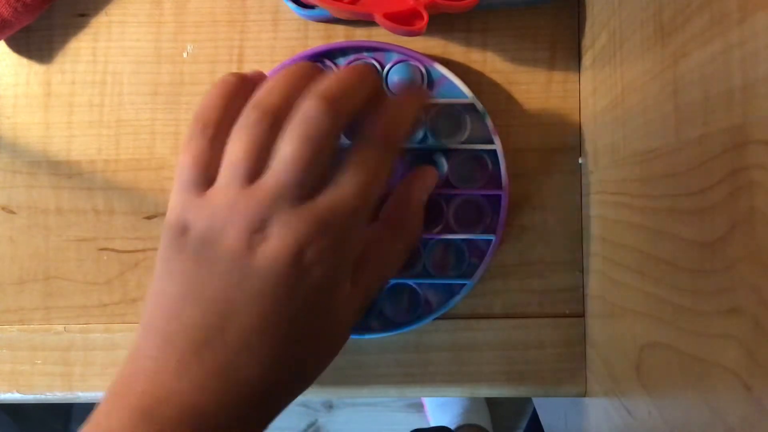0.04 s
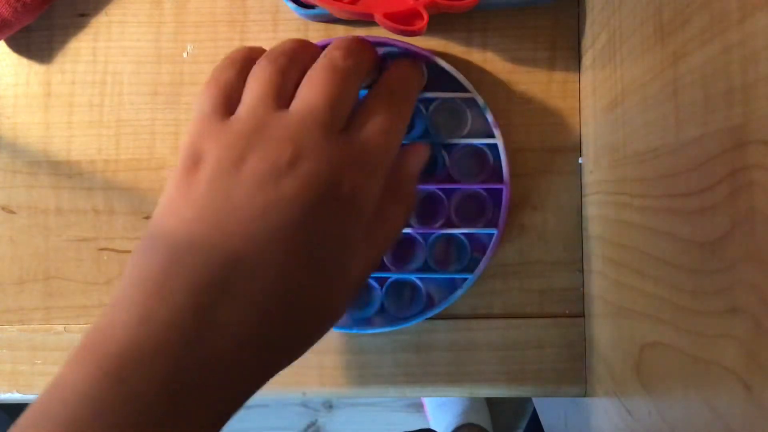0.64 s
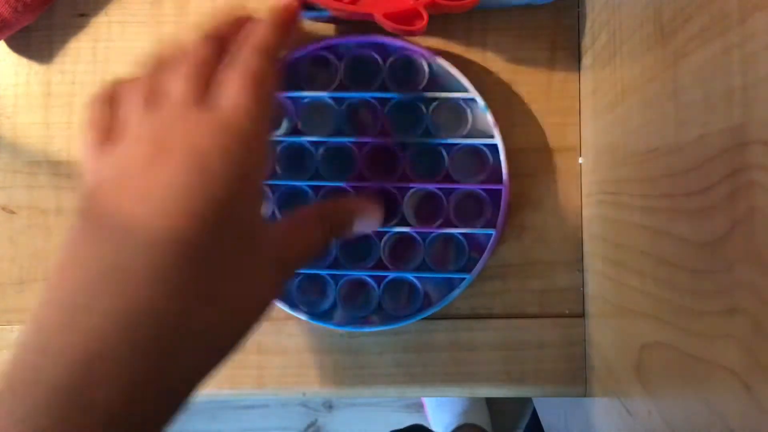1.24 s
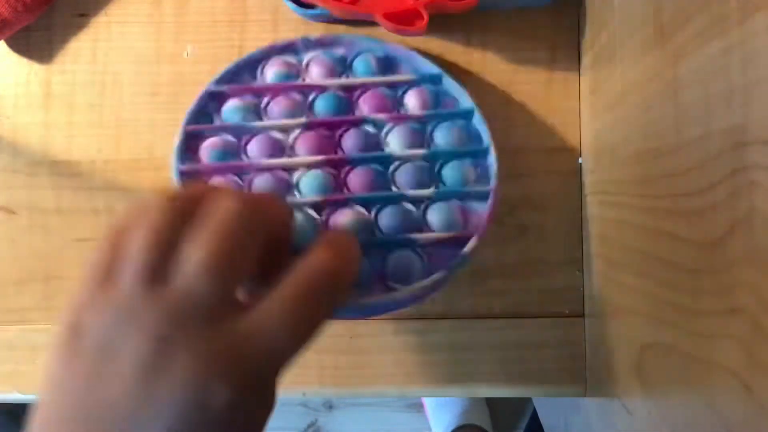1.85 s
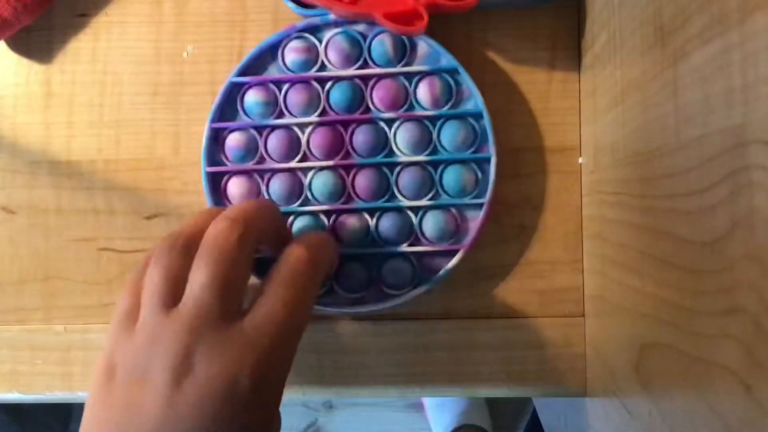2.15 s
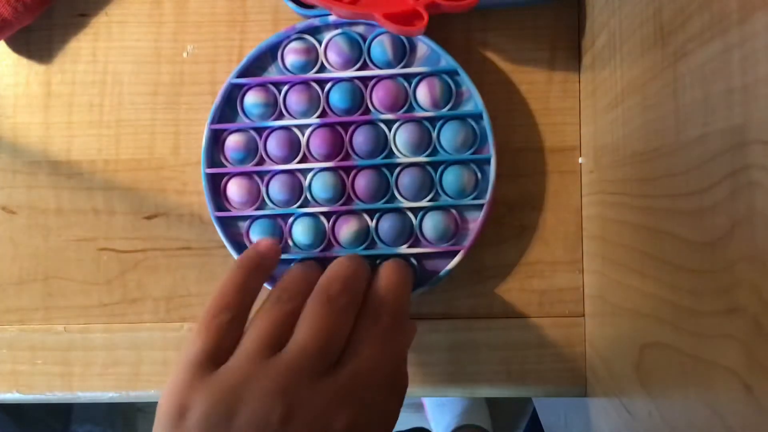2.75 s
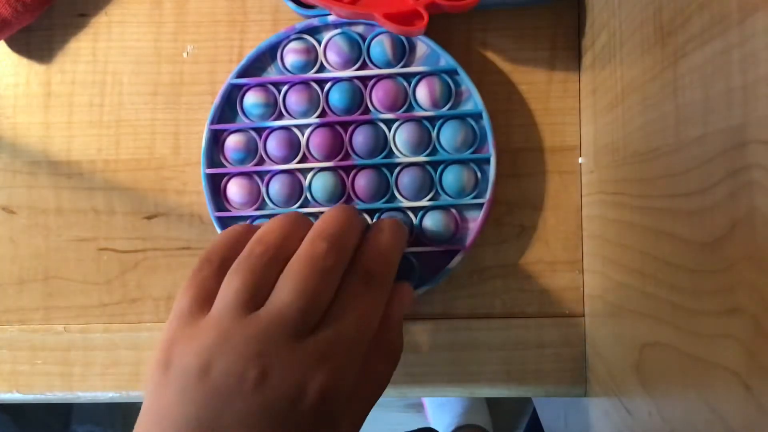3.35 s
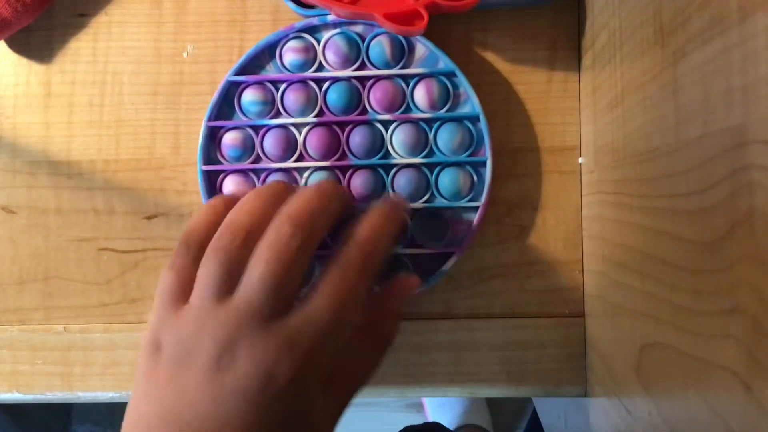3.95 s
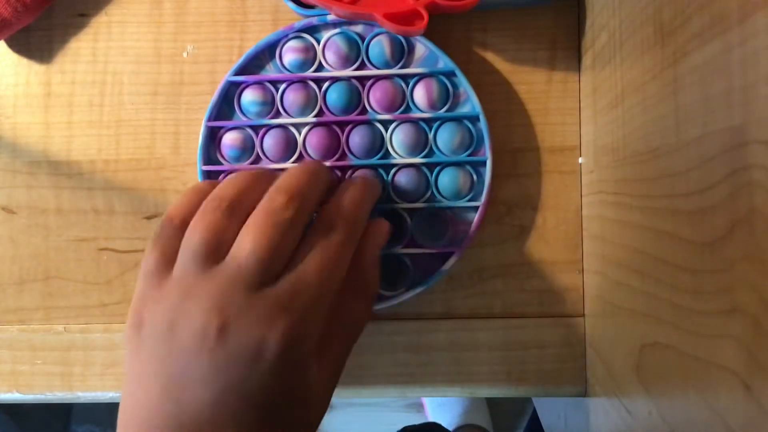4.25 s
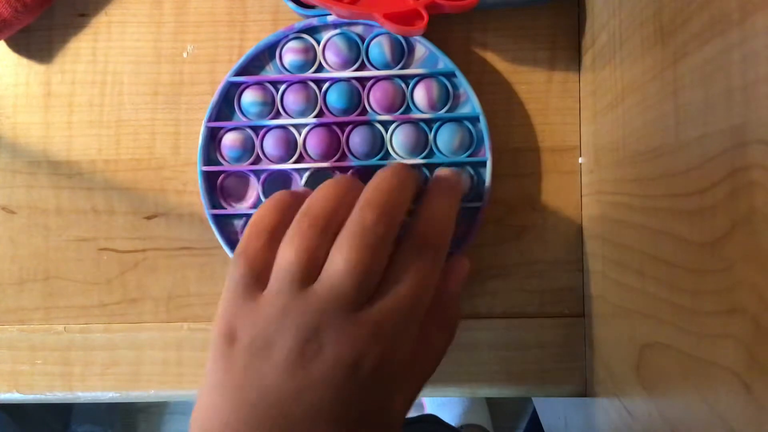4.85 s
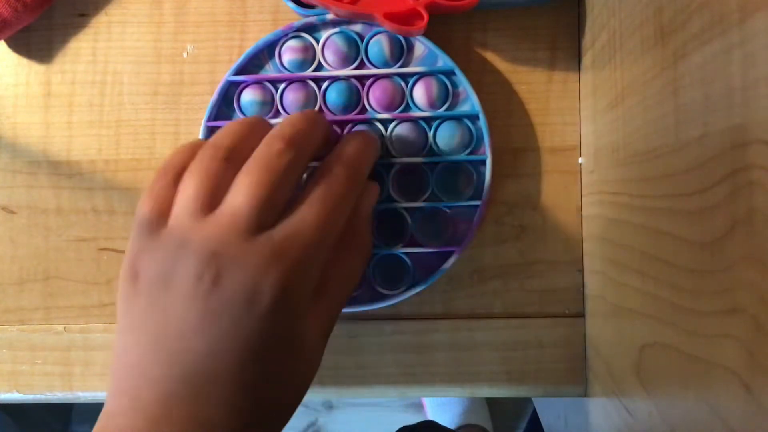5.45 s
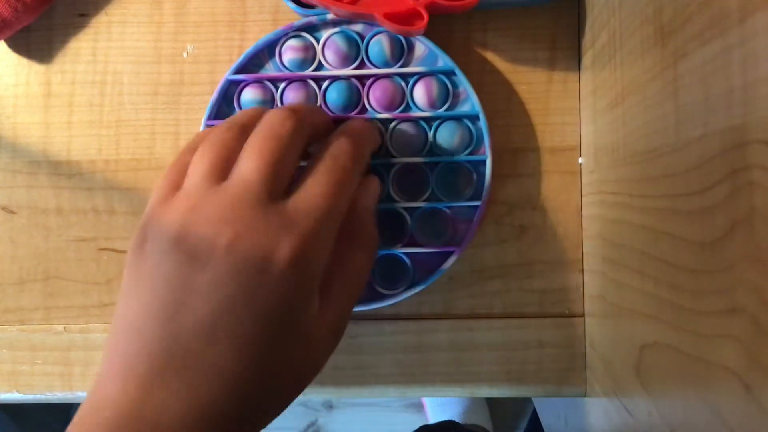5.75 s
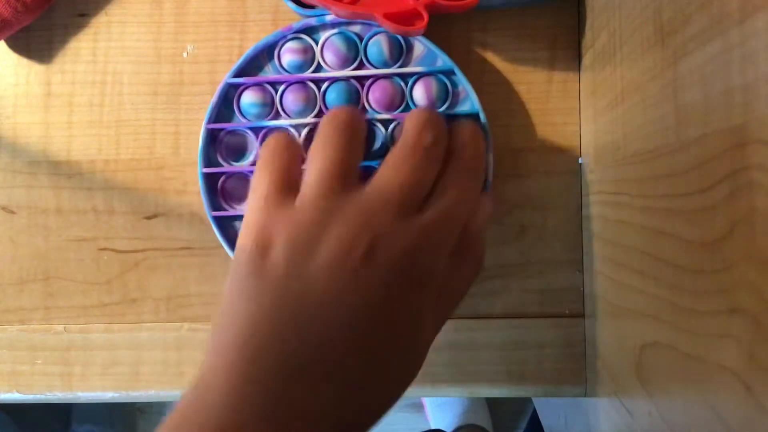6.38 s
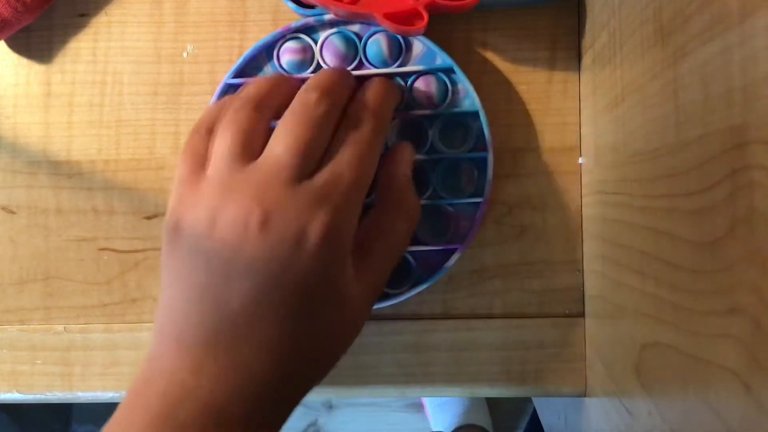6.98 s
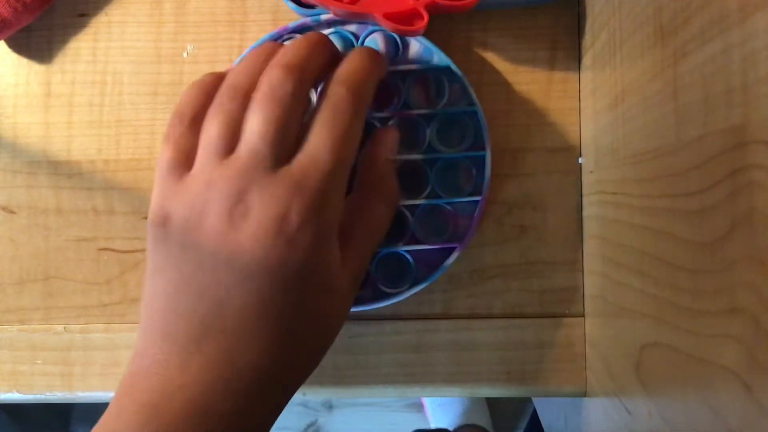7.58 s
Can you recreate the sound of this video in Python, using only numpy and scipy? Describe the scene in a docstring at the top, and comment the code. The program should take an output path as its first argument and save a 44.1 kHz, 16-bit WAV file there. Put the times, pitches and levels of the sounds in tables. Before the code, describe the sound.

Fingers press the bubbles of a silicone pop toy on a wooden table, making clusters of sharp pops with soft taps between.

```python
"""A silicone pop toy on a wooden table in a small quiet room, the microphone close above it.
First come light fingertip taps and one soft pop; then the toy is lifted, turned over and slid back.
From about 2 s several fingers press at once and the pops come in clusters: each dome crackles as it
buckles, snaps through and rings the air pocket under it, and the finger thumps the table.
Between clusters the fingertips tap and rub the rubber; a last tap leaves the low drone of the room."""
import sys
import numpy as np
from scipy import signal
from scipy.fft import rfft, irfft
from scipy.io import wavfile

SR = 44100
rng = np.random.default_rng(int(sys.argv[2]) if len(sys.argv) > 2 else 0)


def generate_wav(sig):
    """Save sig (samples, or channels by samples) to the path in sys.argv[1] as 16-bit PCM at SR."""
    pcm = np.round(np.clip(np.atleast_2d(sig).T, -1, 1) * 32767).astype(np.int16)
    wavfile.write(sys.argv[1], SR, pcm)


N = 340452

# colours of the rubber's slap and of the crackle before it: (frequency [Hz], level [dB])
SLAP_COLOUR = [(100, -42.5), (400, -9), (900, -8), (1350, 5), (1900, -5.5), (2300, -6.5), (2800, -7),
               (3800, -16.5), (6000, -35.5), (10000, -35.5), (16000, -69)]
CRACKLE_COLOUR = [(300, -22), (1500, -8), (2800, 5.5), (3800, -4), (5000, 1.5), (6200, 3.5), (7200, -2),
                  (9500, 0.5), (12000, -9.5), (16000, -21.5)]
# domes snapping through, close under the microphone: (time [s], air pocket [dB], pocket pitch [Hz],
# pocket swell [ms], slap [dB], crackle [dB], air squirt [Hz], thump [dB], thump pitch [Hz])
DOME_SNAPS = [ (0.3025, -27, 710, 0.87, -38, -47, 5830, -34, 222),
              (1.8172, -28, 570, 1.4, -35, -42.5, 3340, -29.5, 234),
              (2.1369, -10, 680, 0.5, -13.5, -32, 3000, -19, 291),
              (2.7035, -13.5, 840, 0.24, -24.5, -28, 4700, -41.5, 226),
              (2.7335, -16, 1060, 0.36, -20, -29, 6900, -35, 255),
              (2.837, -22, 670, 1.16, -17, -29.5, 6270, -27, 275),
              (3.3711, -20.5, 660, .35, -39, -40, 6300, -39, 240),
              (3.3810, -13, 690, 0.48, -13.5, -22.5, 4940, -30.5, 225),
              (3.4041, -9.5, 760, 0.52, -21, -25.5, 2340, -24.5, 238),
              (3.4106, -18.5, 650, 0.57, -18.5, -28, 5400, -24.5, 247),
              (3.416, -17, 693, 1.26, -18, -26, 5830, -21.5, 237),
              (3.6817, -21.5, 628, 1.8, -31, -37, 5900, -42, 223.6),
              (3.6848, -17.5, 738, 1.14, -16, -26, 5980, -26.5, 250),
              (4.2687, -28, 493, 0.63, -39, -37, 9900, -29, 238),
              (4.2781, -11, 715, 0.85, -14, -27, 7600, -28.5, 240),
              (4.2873, -14.5, 672, 2.05, -19, -25.5, 4170, -19, 252),
              (4.2965, -11.5, 680, 0.83, -21, -24.5, 4660, -35, 215),
              (4.947, -44.5, 555, .8, -69.5, -49, 6500, -64, 238),
              (4.9561, -11, 578, 1.17, -20, -25, 4490, -40, 218),
              (5.4870, -26.5, 600, 0.72, -40, -38.5, 9600, -29, 241),
              (5.4970, -18.5, 590, 0.83, -32, -26, 8200, -45, 249),
              (5.5123, -11.5, 682, 1.16, -17.5, -21, 2080, -19, 240.4),
              (5.5264, -13.5, 670, 0.87, -23.5, -24.5, 4600, -31.5, 202),
              (5.7231, -17, 665, 1.14, -20.5, -24.5, 5520, -23.5, 217),
              (6.3098, -14, 640, 1.04, -28, -25, 4530, -43, 200),
              (6.3445, -16, 677, 1, -27.5, -28, 7100, -28, 250),
              (6.9508, -15.5, 610, 0.49, -26, -28, 5800, -23, 259),
              (6.954, -18, 675, 2.34, -31, -22.5, 2500, -20, 253.7),
              (6.9801, -13.5, 726, 1.25, -18, -21, 5700, -28.5, 242),
              (7.2909, -23.5, 558, 1, -29, -48, 9800, -35, 231),
              (7.2969, -14, 846, 0.49, -23, -22, 2740, -33, 233), ]


def pops(dome_hz=1240, spread_octaves=0.23, swell_cycles=0.9, lead_s=0.00017, landing_s=0.0029):
    """Each dome crackles, slaps through, rings with its air pocket, and lets the finger hit the table."""
    out, slap, slip = np.zeros(N), click(SLAP_COLOUR), click(CRACKLE_COLOUR)
    rubber_pitches = dome_hz * 2 ** (spread_octaves * rng.uniform(-1.2, 1, len(DOME_SNAPS)))
    for snap, rubber_hz in zip(DOME_SNAPS, rubber_pitches):
        s, pocket_db, pocket_hz, swell_ms, slap_db, crackle_db, air_hz, thump_db, thump_hz = snap
        crackle = burst(slip, rise_s=0.00045, fall_s=0.00066)
        air = gain_of(-3.5) * squirt(air_hz)
        rubber = ring(rubber_hz, swell_cycles * 1000 / rubber_hz)
        add_centred(out, s - lead_s, gain_of(crackle_db) * (crackle + air))
        add(out, s, gain_of(slap_db) * slap)
        add(out, s, gain_of(slap_db - 15) * rubber)
        add(out, s, gain_of(pocket_db) * ring(pocket_hz, swell_ms))
        add(out, s + landing_s, gain_of(thump_db) * thump(thump_hz))
    return out


def squirt(hz, width_hz=900, size=512):
    """An instant's whistle, as of air escaping through a slit under the rim."""
    t = np.arange(size) / SR
    whistle = np.exp(-np.pi * width_hz * t) * np.sin(2 * np.pi * hz * t)
    return burst(whistle, rise_s=0.0016, fall_s=0.0012)


# low resonances that ring on after each thump: (frequency [Hz], level [dB], time to fall 60 dB [s])
LOW_MODES = [(102, -30, 0.54), (160, -13, 0.18), (239.4, -20, 0.2), (280, -29, 0.12), (448.5, -19.5, 0.098)]


def thump(hz, swell_ms=3.94, sag=0.19, sag_s=0.012, size=16384):
    """The finger lands through the rubber: a dull push that sags in pitch; low resonances ring on."""
    t = np.arange(size) / SR
    pitch = hz * (1 + sag * (2 * np.exp(-t / sag_s) - 1))
    push = swell(t, swell_ms) * np.sin(2 * np.pi * np.cumsum(pitch) / SR)
    ringing = sum(gain_of(db - 60 * t / t60) * np.sin(2 * np.pi * f * t) for f, db, t60 in LOW_MODES)
    return push + ringing * (1 - np.exp(-t / 0.0027))


# colour of a fingertip's scuff: (frequency [Hz], level [dB])
SCUFF_COLOUR = [(200, 2), (800, 6), (1500, -6), (2800, -5.5), (4500, -15.5), (7000, -14), (11000, -21.5),
                (16000, -21.5)]
# soft touches of the fingertips: (time [s], air pocket [dB], scuff [dB], thump [dB])
FINGER_TAPS = [ (0.015, -42.5, -53, -45.5), (0.094, -37.5, -48, -36.5), (0.284, -40, -61, -41.5),
               (0.4495, -61, -54, -31), (1.2435, -68, -60, -32), (2.119, -37, -50, -33.5),
               (2.371, -43.5, -52, -46), (3.1195, -39.5, -55.5, -44.5), (3.533, -49, -59, -42.5),
               (3.6142, -39.5, -50.5, -53.5), (3.873, -51, -65.5, -49), (3.962, -45.5, -56.5, -47.5),
               (4.65, -60, -55.5, -52.5), (4.84, -66, -57, -54), (4.92, -44, -56.5, -42),
               (5.12, -48.5, -58, -39), (5.137, -41.5, -54, -38), (5.152, -39.5, -62, -41),
               (5.230, -38.5, -53.5, -51), (6.081, -45, -51, -47), (6.266, -35, -66.5, -39.5),
               (6.654, -42, -55, -47.5), (6.942, -29, -36.5, -34), (7.205, -67, -56, -47.5),
               (7.541, -40.5, -58, -41.5), ]


def taps(pocket_hz=561, thump_hz=209, landing_s=0.00352):
    """Touches that flip no dome: a soft scuff, a brief ring of the air pocket, and a thump."""
    out, slip = np.zeros(N), click(SCUFF_COLOUR)
    for s, pocket_db, scuff_db, thump_db in FINGER_TAPS:
        add_centred(out, s, gain_of(scuff_db) * burst(slip, rise_s=0.0012, fall_s=0.0053))
        add(out, s, gain_of(pocket_db) * ring(pocket_hz, swell_ms=0.75))
        add(out, s + landing_s, gain_of(thump_db) * thump(thump_hz))
    return out


# the rim meets hand and table as the toy is turned over:
# (time [s], rim [dB], rim pitch [Hz], scuff [dB], thump [dB])
RIM_KNOCKS = [ (1.3109, -38, 1040, -48, -55), (1.3198, -44, 1290, -53, -45),
              (1.342, -47.5, 900, -50, -47.5), (1.540, -55, 1690, -58, -38.5), (1.546, -40, 720, -51, -44),
              (1.752, -77, 900, -57, -66), (1.8926, -36.5, 800, -52.5, -34), (1.964, -41, 960, -56, -53), ]


def knocks(thump_hz=245, landing_s=0.0031):
    """The stiffer rim gives a crisp scuff and a short, higher ring before its thump."""
    out, slip = np.zeros(N), click(SCUFF_COLOUR)
    for s, rim_db, rim_hz, scuff_db, thump_db in RIM_KNOCKS:
        add_centred(out, s, gain_of(scuff_db) * burst(slip, rise_s=0.00056, fall_s=0.0043))
        add(out, s, gain_of(rim_db) * ring(rim_hz, swell_ms=0.26))
        add(out, s + landing_s, gain_of(thump_db) * thump(thump_hz))
    return out


# fingertips sliding on the rubber: (middle time [s], length [s], level [dB])
FINGER_RUBS = [ (0.731, 0.021, -70.5), (1.063, 0.051, -65), (1.28, 0.072, -64.5), (1.489, 0.096, -66),
               (1.632, .13, -71.5), (1.869, 0.029, -63), (3.003, 0.023, -62.5), (3.523, 0.022, -61.5),
               (3.83, 0.087, -59), (4.50, 0.074, -62), (5.108, 0.048, -60), (5.95, .04, -59),
               (6.25, 0.028, -69), (6.532, 0.058, -63), (7.137, 0.013, -65.5), (7.44, 0.053, -59.5), ]


def rubs(centre_hz=5030, spread_octaves=0.16, squeaks=3):
    """Skin slides over the domes in a grainy hiss, and catches a few times in tiny squeaks."""
    out = np.zeros(N)
    for s, length, db in FINGER_RUBS:
        hiss = slide(length, centre_hz, octaves=0.3, slips_per_s=1100, spread_db=3, body_db=5.5)
        add_centred(out, s, gain_of(db - 4.5) * hiss)
        for when, grip in rng.uniform(-1, 1, (squeaks, 2)):
            squeak = squirt(centre_hz * 2 ** (spread_octaves * grip), width_hz=550)
            add_centred(out, s + when * length / 2, gain_of(db + 3.5) * squeak)
    return out


# the toy dragging over the wood: (middle time [s], length [s], level [dB], band centre [Hz])
RIM_DRAGS = [ (1.259, 0.027, -61.5, 13400), (1.46, 0.016, -61, 3000), (1.476, 0.01, -56.5, 2010),
             (1.509, 0.019, -63, 2110), (1.542, 0.017, -54.5, 1700), (2.075, 0.093, -62.5, 1300),
             (2.175, .073, -61, 2400), (3.772, 0.13, -74, 1670), ]


def drags():
    """The rim catches and slips on the table."""
    out = np.zeros(N)
    for s, length, db, hz in RIM_DRAGS:
        scrape = slide(length, hz, octaves=0.5, slips_per_s=900, spread_db=1.5, body_db=-12)
        add_centred(out, s, gain_of(db) * scrape)
    return out


def slide(length, centre_hz, octaves, slips_per_s, spread_db, body_db, size=16384):
    """Sliding rubber: a swell of separate sticky slips in one broad band, over a duller body."""
    t, hz = (np.arange(size) - size // 2) / SR, np.fft.rfftfreq(size, 1 / SR)
    strengths = rng.standard_normal(size) * gain_of(spread_db * rng.standard_normal(size))
    slips = strengths * (rng.random(size) < slips_per_s / SR)
    band = 1 / (1 + (np.log2((hz + 1) / centre_hz) / octaves) ** 2)
    body = gain_of(body_db + curve_at(SCUFF_COLOUR, hz))
    return unit_rms(irfft(rfft(slips) * (band + body))) * np.exp(-(2 * t / length) ** 2)


# colour of the way to the microphone, close over the table: (frequency [Hz], gain [dB])
MIC_PATH = [(20, -33), (50, -17), (100, 4), (180, 3), (255, 0), (355, -2), (440, 2), (650, 0.5), (1000, 3),
            (1180, 2.5), (1400, 2.5), (2200, -1.5), (9000, -8.5), (16000, -5)]


def path_to_microphone(x):
    """The short way up from the toy favours the lows and mids and softens the treble."""
    response = click(MIC_PATH)
    peak_db = curve_at(MIC_PATH, np.fft.rfftfreq(len(response), 1 / SR)).max()
    response *= gain_of(peak_db) / abs(rfft(response)).max()
    return signal.oaconvolve(x, response)[:len(x)]


# echoes off the hand and nearby things: (delay [ms], gain [ratio])
NEAR_ECHOES = [(2.9, 0.088), (4.6, 0.12), (6.3, 0.023), (8.8, 0.0087)]
# scatter off the furniture and, farther out, the room's tail: (frequency [Hz], level [dB])
SCATTER_COLOUR = [(100, -40.5), (250, -21), (450, -7.5), (700, -9), (1500, -11), (4000, -7), (9000, -7.5),
                  (16000, -16.5)]
TAIL_COLOUR = [(100, -19), (250, -10), (700, -22.5), (1500, -19), (3000, -20.5), (5500, -18.5), (9000, -24),
               (16000, -18.5)]
# their decays: (frequency [Hz], time to fall 60 dB [s])
SCATTER_DECAY = [(100, 0.2), (1000, 0.045), (16000, 0.044)]
TAIL_DECAY = [(100, 0.64), (300, 0.17), (1000, 0.29), (5000, 0.23), (9000, 0.25), (16000, 0.057)]


def room(x, poses=5, poses_per_s=2):
    """Direct sound and near echoes; the scatter and the tail change as the hand moves about."""
    near = np.zeros(1024)
    near[0] = 1
    for ms, gain in NEAR_ECHOES:
        add(near, ms / 1000, np.array([gain]))
    out = signal.oaconvolve(x, near)[:N]
    pose = np.arange(N) / SR * poses_per_s
    for k in range(poses):
        away = abs((pose - k + poses / 2) % poses - poses / 2)
        crossfade = np.cos(np.pi / 2 * np.minimum(away, 1))
        scatter = dense_echoes(SCATTER_COLOUR, SCATTER_DECAY, start_s=0.0025)
        tail = dense_echoes(TAIL_COLOUR, TAIL_DECAY, start_s=0.012)
        out += signal.oaconvolve(x * crossfade, scatter + tail)[:N]
    return out


def dense_echoes(colour, decay, start_s, size=32768):
    """Random reflections, each band dying away at its own rate."""
    hz, t, noise = signal.stft(rng.standard_normal(size), SR, nperseg=256)
    t60 = curve_at(decay, hz)[:, None]
    unit_energy = np.sqrt(2 * np.log(1000) / (t60 * SR))
    envelope = gain_of(curve_at(colour, hz)[:, None] - 60 * t / t60)
    wave = signal.istft(noise * unit_energy * envelope, SR)[1]
    return np.pad(wave, (round(start_s * SR), 0))[:size]


# the still room behind the toy: (frequency [Hz], relative level [dB])
ROOM_TONE_COLOUR = [(20, -33.5), (45, -14.5), (70, -6.5), (105, 1.5), (140, -9.5), (200, -9.5),
                    (280, -14.5), (420, -18.5), (750, -25), (1150, -34.5), (1500, -33.5), (1900, -38.5),
                    (2400, -37.5), (4000, -45), (11500, -52.5), (15500, -48)]
# its droning resonances: (frequency [Hz], width [Hz], boost [dB])
ROOM_RESONANCES = [(160.2, 16, 10.5), (240.4, 4.9, 22), (300, 7.2, 8.5), (431.2, 17, 14), (554.7, 8.2, 20),
                   (647, 51, 4), (825, 7.5, 6), (1488, 120, 7.5), (5650, 600, 5.5), (8850, 450, 7)]


def room_tone(level_db=-56):
    """The low drone of the room, with a few resonances, and faint hiss."""
    hz = np.fft.rfftfreq(N, 1 / SR)
    peaks_db = sum(db / (1 + (2 * (hz - f) / width) ** 2) for f, width, db in ROOM_RESONANCES)
    spectrum = rfft(rng.standard_normal(N)) * gain_of(curve_at(ROOM_TONE_COLOUR, hz) + peaks_db)
    return gain_of(level_db) * unit_rms(irfft(spectrum, N))


def click(colour, size=2048):
    """The shortest causal click with this spectrum, peak 1."""
    log_gain = np.log(gain_of(curve_at(colour, abs(np.fft.fftfreq(size, 1 / SR)))))
    minimum_phase = np.exp(np.conj(signal.hilbert(log_gain)))
    wave = np.fft.ifft(minimum_phase).real[:size // 2]
    return wave / abs(wave).max()


def burst(slip, rise_s, fall_s, size=2048):
    """Tiny slips that grow up to the middle and die away, each ringing like the given one."""
    t = (np.arange(size) - size // 2) / SR
    strengths = rng.standard_normal(size) * np.exp(np.minimum(t / rise_s, -t / fall_s))
    return np.convolve(strengths, slip / np.linalg.norm(slip))[:size]


def ring(hz, swell_ms, size=4096):
    """A heavily damped tone."""
    t = np.arange(size) / SR
    return swell(t, swell_ms) * np.sin(2 * np.pi * hz * t)


def swell(t, swell_ms):
    """An envelope that reaches 1 after swell_ms and dies."""
    age = t * 1000 / swell_ms
    return age * np.exp(1 - age)


def gain_of(db):
    return 10 ** (np.asarray(db) / 20)


def unit_rms(x):
    return x / np.sqrt(np.mean(x ** 2) + 1e-20)


def curve_at(points, hz):
    """Joins (frequency [Hz], value) points on a log-frequency axis."""
    f, value = np.transpose(points)
    return np.interp(np.log(hz + 1), np.log(f + 1), value)


def add(mix, s, sound):
    """Mixes a sound in, starting at time s."""
    part = mix[max(round(s * SR), 0):][:len(sound)]
    part += sound[:len(part)]


def add_centred(mix, s, sound):
    add(mix, s - len(sound) / 2 / SR, sound)


def scene():
    """The toy on the table, heard through one microphone just above it."""
    toy = pops() + taps() + knocks() + rubs() + drags()
    return (room(path_to_microphone(toy)) + room_tone())[None]


def record(dry, edge_hz=16200):
    """The band limit of the recorder."""
    lowpass = signal.firwin(511, edge_hz, window=("kaiser", 9), fs=SR)
    return signal.oaconvolve(dry, lowpass[None], "same")


dry = scene()
out = record(dry)
generate_wav(out)
```